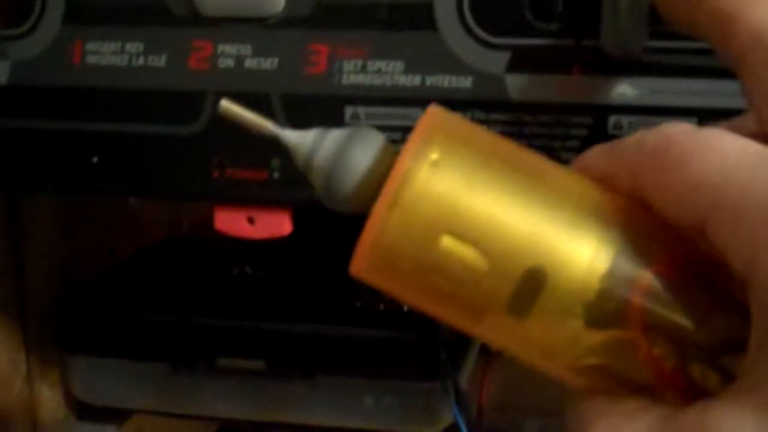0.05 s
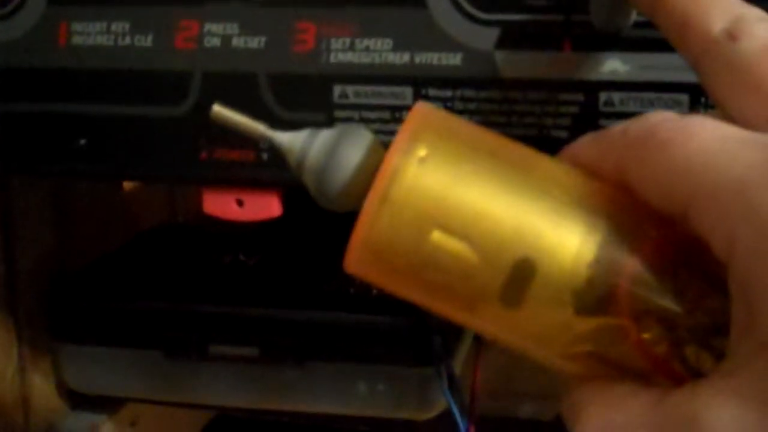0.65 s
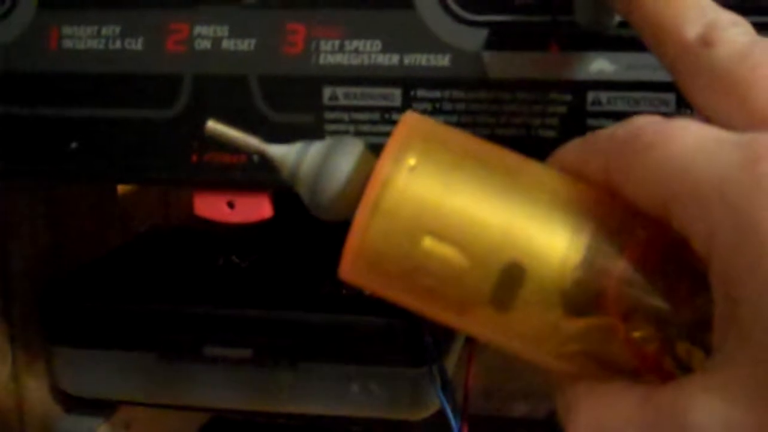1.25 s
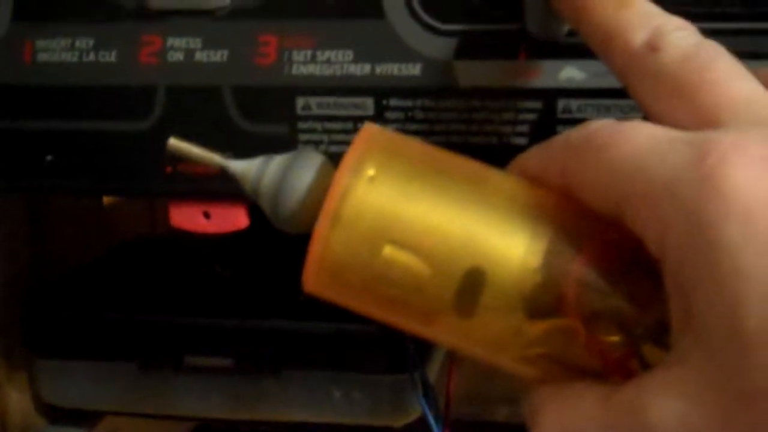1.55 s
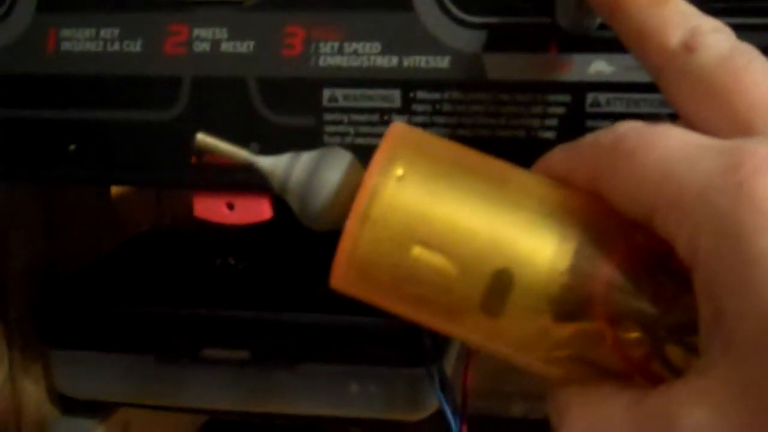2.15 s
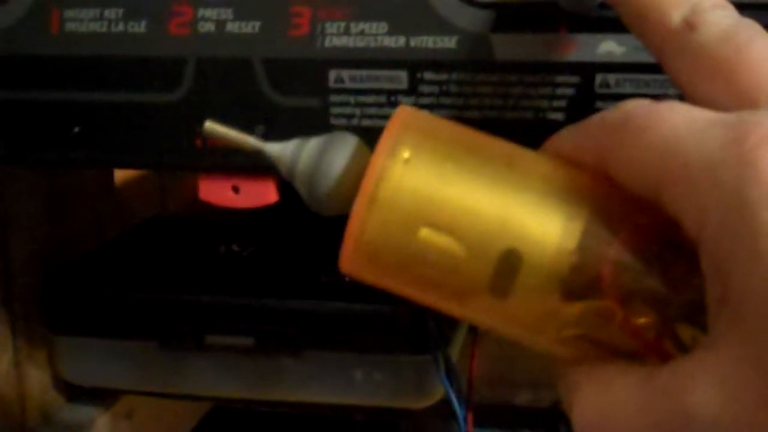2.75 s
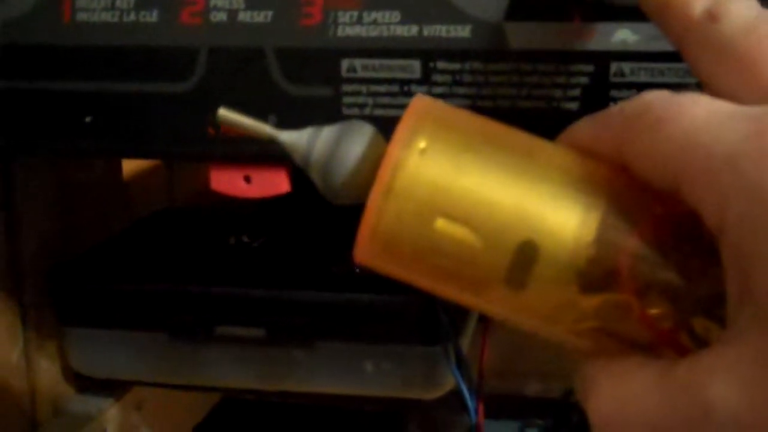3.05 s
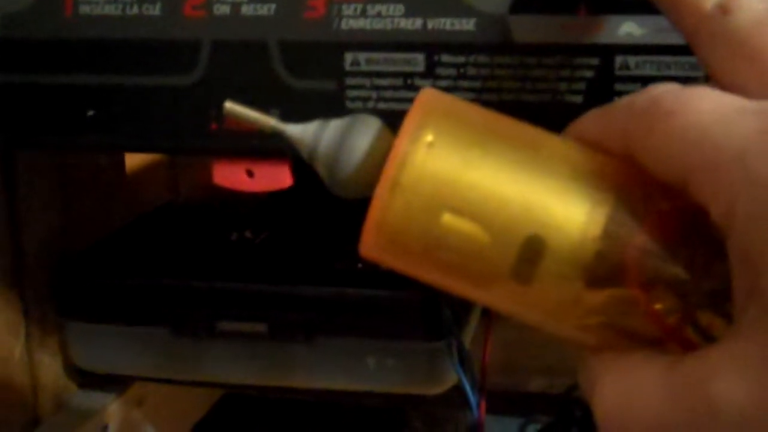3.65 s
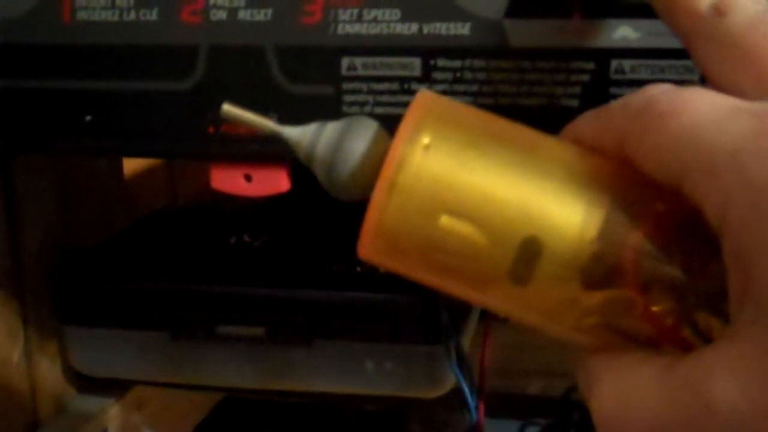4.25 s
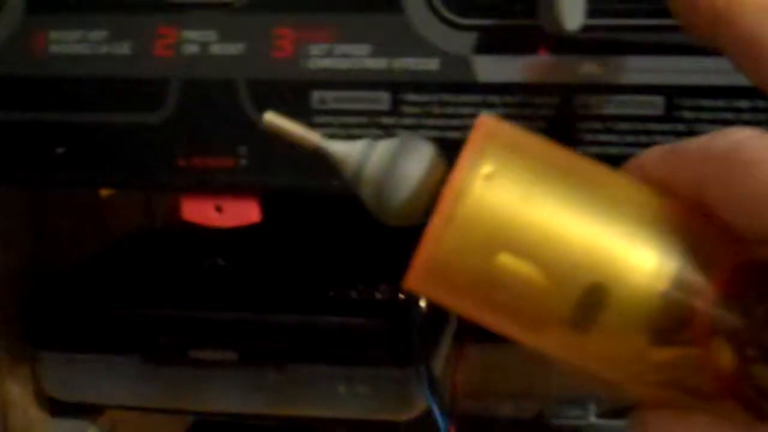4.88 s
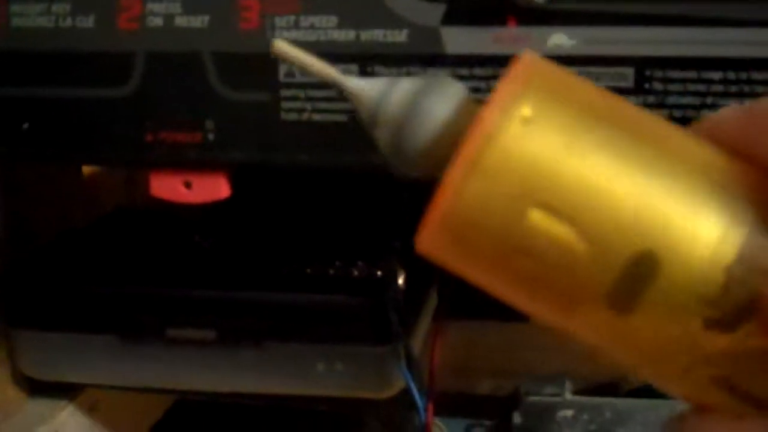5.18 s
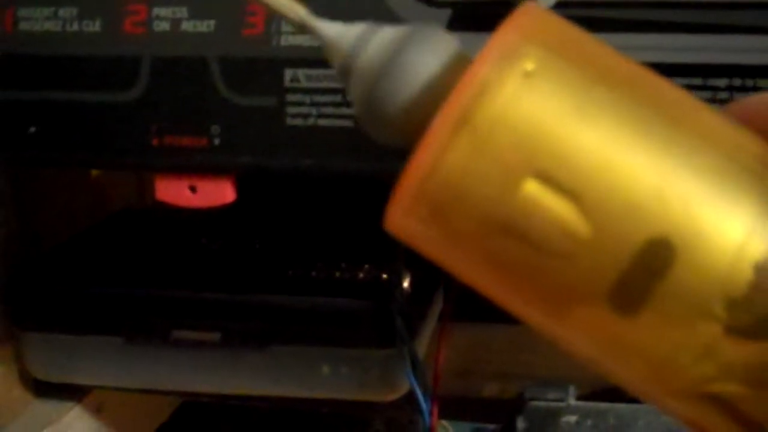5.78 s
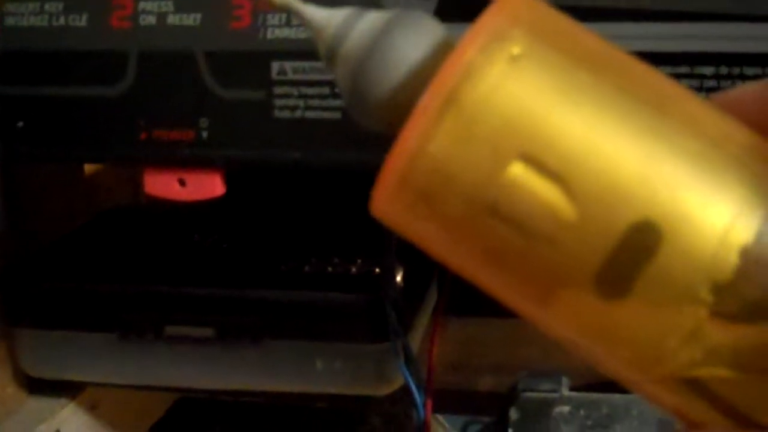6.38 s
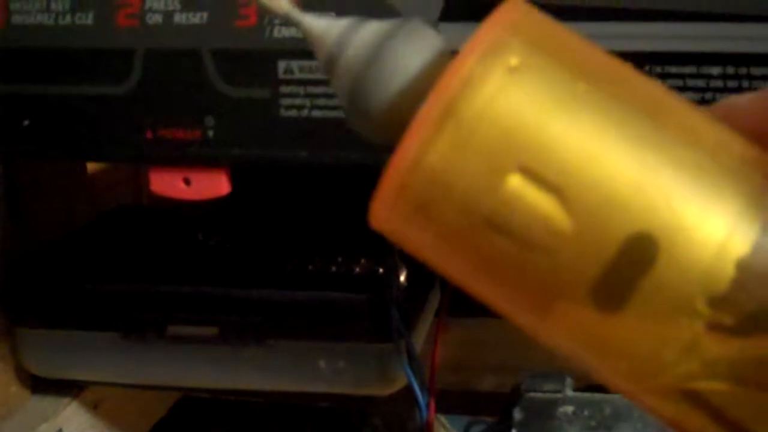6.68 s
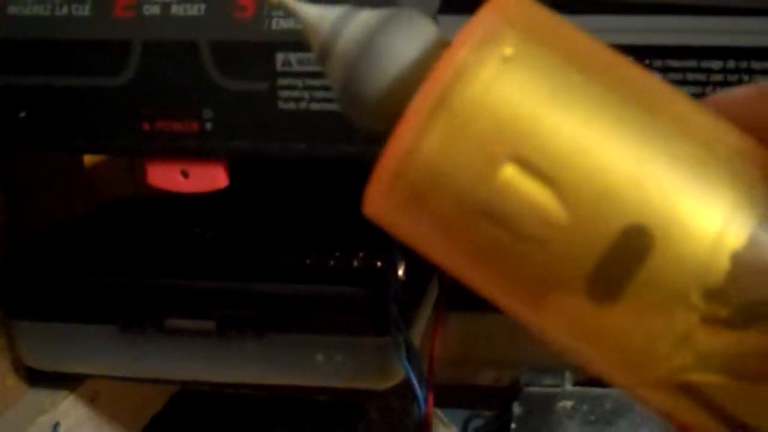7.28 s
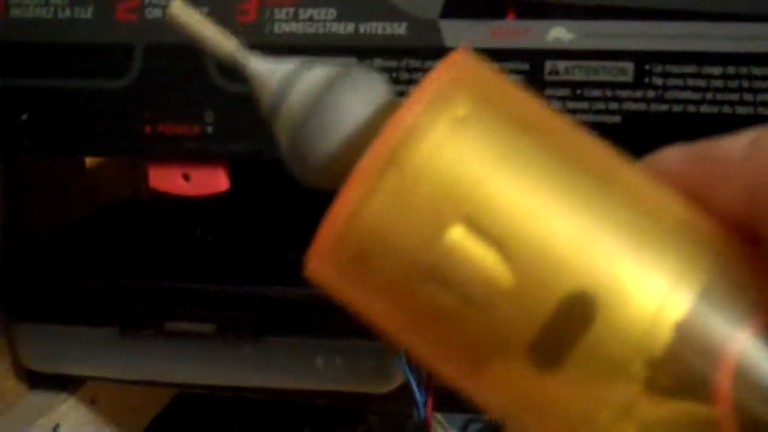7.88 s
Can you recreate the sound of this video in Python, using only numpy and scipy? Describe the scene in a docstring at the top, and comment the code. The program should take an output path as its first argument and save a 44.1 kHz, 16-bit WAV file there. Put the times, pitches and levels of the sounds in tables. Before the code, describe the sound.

A small hand-held electric motor is already running at full speed, close to the microphone in a quiet room. Its high, buzzy whine holds steady, mixed with hissing brushes, a rubbing bearing and a few light ticks. A soft handling bump comes at about 0.4 seconds. From about 1.6 seconds the whine glides down in pitch, falling further from 2.7 seconds and gradually weakening, with brief scuffs from the rotor early on. As the motor slows, its loose shaft knocks more distinctly, making a fast rattle that rings the metal can and plastic shell, with harder knocks around 4 seconds. At about 5 seconds the motor comes closer and the rattle grows brighter. From 5.6 seconds to the end at about 8 seconds it settles toward an idle with dense, uneven metallic knocks. A faint mains hum lies underneath throughout.

```python
"""A small motor whines at full speed, then slows to an idle, knocking more and more as it slows.
It is a hand-held three-pole DC motor, turned down by a speed controller that feeds it rectified mains.
The whine is harmonics of the turning rate. The brushes hiss, the rotor scuffs, and the shaft knocks
in its loose bearing, ringing the shell, can and end cap. The hand brings the motor closer at about 5 s.
Mains hum lies underneath."""
import sys
import numpy as np
from scipy import signal
from scipy.fft import rfft, irfft, next_fast_len
from scipy.io import wavfile
from scipy.ndimage import uniform_filter1d

SR = 44100
rng = np.random.default_rng(int(sys.argv[2]) if len(sys.argv) > 2 else 0)


def master_out(mix):
    """Clip the mix to full scale and print it as 16-bit PCM to the path in sys.argv[1]."""
    frames = np.transpose(np.atleast_2d(mix))
    ceiling = np.clip(frames, -1, 1)
    pcm = np.round(ceiling * 32767).astype(np.int16)
    wavfile.write(sys.argv[1], SR, pcm)


N = 358533
TIME = np.arange(N) / SR
FFT_SIZE = 2 * next_fast_len(N // 2 + 4096)
FREQS = np.maximum(np.arange(FFT_SIZE // 2 + 1) * SR / FFT_SIZE, 1)
POLES, RIPPLE_HZ = 3, 120  # rectified mains pushes twice a cycle


def rotor_speed(start_rps=183.6, inertia_s=1.32):
    """Turns per second (rps): inertia makes the rotor approach each setting exponentially."""
    # Controller settings. Each row: start in seconds, target in rps.
    settings = [(0.03, 188.1), (0.9, 185.6), (1.63, 86.8), (2.71, 42.2)]
    rps, previous_rps = np.full(N, start_rps), start_rps
    for start_s, target_rps in settings:
        rps += (target_rps - previous_rps) * (1 - np.exp(-np.maximum(TIME - start_s, 0) / inertia_s))
        previous_rps = target_rps
    return rps


def whine(rps, turns, gain_db, jitter_turns=.0013, flare_hz=6150, flare_width_hz=760, flare_db=7.5):
    """Rotor harmonics glide through the housing's resonances; supply ripple adds sidebands."""
    # Rotor tones. Each row: multiple of the turning rate, source dB at full speed, medium speed, idle.
    harmonics = [(1, -45, -55, -60), (2, -56, -60, -62), (3, -39, -42, -40), (4, -53, -49, -62),
                 (5, -47, -48.5, -57), (6, -40, -50, -59), (7, -41, -48, -59), (8, -41.5, -46, -58),
                 (9, -35, -47, -47.5), (10, -43, -46, -58), (11, -39, -48, -57), (12, -58, -46, -45.5),
                 (13, -46, -43, -59), (14, -38.5, -46.5, -57), (15, -52, -45, -48), (16, -47, -46, -51),
                 (17, -49, -51, -52), (18, -45, -48, -49), (19, -50, -47, -53), (20, -49, -51, -48),
                 (21, -52, -47, -47), (22, -53, -47, -47), (23, -53, -54, -48), (24, -38, -50, -50),
                 (25, -43, -56, -54), (27, -38.5, -49, -48), (28, -46, -58, -59), (30, -38.5, -44, -51),
                 (31, -46, -54, -56), (32, -49, -53, -57), (33, -45, -49, -53), (34, -53, -48, -60),
                 (35, -49, -47, -60), (37, -51, -48, -56), (38, -52, -47, -60), (40, -46, -42.5, -61),
                 (41, -48, -45, -61), (43, -48, -41.5, -60), (47, -54, -49, -60), (49, -56, -50, -60),
                 (51, -56, -48, -58), (60, -58, -49, -52)]
    # Radiation of the small housing. Each row: frequency in Hz, gain in dB.
    radiation = [(100, -43), (200, -32), (265, -17.5), (335, -18.5), (430, -6), (560, 0), (700, 0),
                 (850, -5.5), (1100, 0), (2000, 0.8), (4500, 0.8), (6350, 0), (6700, -8), (10000, -15)]
    # Flicker of gliding tones. Each row: frequency in Hz, depth in dB at medium speed.
    flicker = [(420, 1.3), (600, 2.8), (1500, 2), (5000, 1)]
    angle = 2 * np.pi * (turns + jitter_turns * drift(25))
    coarse_rps, coarse_s = rps[::64], TIME[::64]
    fast = np.clip((coarse_rps - 160) / 23, 0, 1)
    slow = np.clip((95 - coarse_rps) / 22, 0, 1)
    crawl_db = 7 * np.clip((68 - coarse_rps) / 24, 0, 1)
    gliding = (1 - fast) * (1 - slow / 2)
    octaves = np.log2(np.outer([row[0] for row in harmonics], coarse_rps))
    peaks_db = 1.8 * gliding * drift(16, octaves)  # narrow peaks and dips of housing and room
    tones = np.zeros(N)
    for (multiple, full_db, medium_db, idle_db), peak_db in zip(harmonics, peaks_db):
        hz = multiple * coarse_rps
        db = medium_db + fast * (full_db - medium_db) + slow * (idle_db - medium_db)
        db += peak_db + at_hz(radiation, hz)
        db += flare_db * bell(hz, flare_hz, flare_width_hz)
        db += .37 * np.clip(hz / 1200, 0, 1) ** 2 * drift(15, coarse_s)  # slight waver
        db += gliding * at_hz(flicker, hz) * drift(28, coarse_s)
        db -= crawl_db * np.clip((530 - hz) / 120, 0, 1)  # deep tones fade at a crawl
        gain = np.interp(TIME, coarse_s, from_db(db))
        tones += gain * np.sin(multiple * angle + rng.uniform(0, 2 * np.pi))
    # Ripple shakes both force and speed, so the upper sideband is the stronger.
    ripple = np.exp(2j * np.pi * RIPPLE_HZ * TIME)
    sidebands = 1 + .36 * ripple + .024 * ripple.conj()
    return np.sqrt(2) * from_db(gain_db) * (signal.hilbert(tones, FFT_SIZE)[:N] * sidebands).real


def motor_noise(rps, turns, scatter_db, swing_db):
    """Rub, hiss and rattle, all pulsing with the rotor. Rows: direct, scattered sound."""
    # Part levels. Each row: speed in rps, base dB of rub, brushes, shell, can, end cap.
    levels = [(41.8, -32.5, -37.5, -42.5, -43, -47.5), (59, -31.5, -30.5, -37.5, -36.5, -37.5),
              (72, -31, -28, -34, -35.5, -35), (89, -27.5, -23.5, -32, -38, -26.5),
              (118, -29, -24, -30, -38, -28.5), (124, -31, -24.5, -31.5, -34, -26.5),
              (137, -31.5, -22, -30, -41, -24), (142, -33, -24, -35, -35.5, -25.5),
              (147, -32, -26, -34, -35, -24), (158, -29.5, -27, -35.5, -34.5, -24),
              (188, -32.5, -26.5, -34.5, -31.5, -22)]
    # Gain when held near, in dB: rub, brushes, shell, can, end cap.
    near_db = (2.32, 3.6, 0.5, 9.6, 14.9)
    parts_db = at_speed(levels, rps) + np.outer(near_db, nearness())
    rub_db, brush_db, shell_db, can_db, cap_db = parts_db
    scuff_rub_db, scuff_hiss_db, scuff_can_db = scuffing()
    surge = from_db(scuff_hiss_db + .87 * drift(40))
    knock = shaft_knocks(turns, scatter_db, swing_db)
    hard_cap, hard_can = hard_knocks(rps)
    # Only a share of each part's power follows the knocks.
    rubbing, brushing, ringing = [np.sqrt(1 - share + share * knock ** 2) for share in (.31, .43, .64)]
    rub = bearing_rub(from_db(rub_db + scuff_rub_db) * rubbing, rps, turns)
    hiss = brush_hiss(from_db(brush_db) * brushing * surge, hard_cap)
    shell = shell_ring(from_db(shell_db) * ringing)
    can = can_ring(from_db(can_db + scuff_can_db) * ringing * surge, hard_can)
    cap = end_cap_rattle(from_db(cap_db) * knock * surge, hard_cap)
    return echoes(hiss_dip(rub + hiss) + shell + can + cap + sizzle(knock * surge))


def shaft_knocks(turns, scatter_db, swing_db, jitter_s=.0005, play_limit=.6, floor=.07):
    """Envelope, rms near 1: the loose shaft knocks as each pole passes; the play caps the force."""
    passes = np.flatnonzero(np.diff(np.floor(POLES * (turns - .15))))
    strength, timing = rng.standard_normal((len(passes), 2)).T
    hits = np.clip(passes + (timing * jitter_s * SR).astype(int), 0, N - 1)
    strength = np.clip(strength, -2.5, play_limit)
    unbalance_db = swing_db * np.cos(2 * np.pi * (turns - .17))  # presses harder on one side
    energy = np.zeros(N)
    energy[hits] = from_db(scatter_db[passes] * strength + unbalance_db[passes]) ** 2
    power = contact(energy, rise_s=.00125)
    power /= uniform_filter1d(power, SR // 4) + 1e-9
    return np.sqrt((power + floor) / (1 + floor))


def hard_knocks(rps, rebounds=2, loss_db=7.5):
    """End cap and can envelopes of knocks that use up all the play and rebound as the next poles pass."""
    # Each row: start in seconds, relative peak dB in the end cap, in the can.
    knocks = [(0.629, -11, -29), (0.645, -12, -31), (0.7797, -12, -32), (0.8553, -11, -23),
              (1.0543, -11, -33), (1.2052, -12, -29), (1.2804, -12, -31), (3.7534, -15, -31),
              (3.7639, -18, -31), (3.7763, -17, -24), (3.7885, -17, -32), (3.8259, -15, -23),
              (3.8889, -17, -29), (3.9014, -18, -28), (3.9275, -15, -34), (4.0189, -18, -25),
              (4.18, -19, -29), (4.2939, -19, -33), (4.4293, -17, -28), (4.9401, -17, -26),
              (4.9574, -19, -24), (5.1502, -21, -32), (5.6491, -16, -18), (5.7012, -14, -20),
              (5.7606, -14, -28), (5.8051, -15, -24), (5.8578, -16, -17), (5.9173, -16, -20),
              (5.9242, -15, -23), (5.9577, -14, -21), (5.9984, -13, -21), (6.0046, -15, -20),
              (6.0192, -14, -22), (6.0594, -12, -19), (6.0999, -15, -29), (6.1413, -13, -23),
              (6.2439, -14, -18), (6.2508, -14, -23), (6.2714, -15, -21), (6.2852, -15, -18),
              (6.2989, -14, -18), (6.326, -14, -16), (6.368, -13, -15), (6.4098, -15, -19),
              (6.4523, -17, -19), (6.5159, -13, -17), (6.5228, -18, -18), (6.601, -14, -21),
              (6.6291, -17, -23), (6.6438, -16, -22), (6.7297, -18, -20), (6.7513, -17, -26),
              (6.7729, -18, -21), (6.8168, -11, -20), (6.9838, -19, -31), (6.991, -17, -22),
              (7.0491, -18, -17), (7.057, -20, -18), (7.1154, -16, -19), (7.1663, -17, -21),
              (7.1887, -18, -16), (7.2255, -18, -24), (7.2326, -17, -19), (7.256, -18, -25),
              (7.2994, -15, -20), (7.366, -16, -17), (7.4328, -19, -20), (7.4553, -17, -20),
              (7.4997, -17, -19), (7.5149, -18, -24), (7.5225, -17, -23), (7.5894, -19, -21),
              (7.6563, -18, -18), (7.6726, -19, -25), (7.8072, -20, -20), (7.8155, -17, -17),
              (7.9537, -17, -26), (7.9761, -15, -23), (7.9901, -20, -18), (7.997, -19, -19),
              (8.0672, -19, -22), (8.088, -20, -19)]
    energy = np.zeros((2, N + SR))
    next_starts_s = [row[0] for row in knocks[1:]] + [np.inf]
    for (start_s, *peaks_db), next_s in zip(knocks, next_starts_s):
        pole_s = 1 / (POLES * np.interp(start_s, TIME, rps))
        for k in range(rebounds + 1):
            if k == 0 or start_s + (k + .5) * pole_s < next_s:
                hit = int((start_s + k * pole_s) * SR)
                energy[:, hit] += from_db(np.array(peaks_db) - k * loss_db) ** 2
    return [np.sqrt(contact(part[:N], rise_s=.0012)) for part in energy]


def scuffing():
    """Level changes in dB as the rotor briefly scuffs or runs free, with abrupt edges."""
    # Each row: centre in seconds, length in seconds, dB on rub, dB on hiss and rattle, more dB on can.
    scuffs = [(0.134, 0.025, 3, 3.5, 0), (0.885, 0.025, 0, -3, 0), (0.918, 0.018, 3, 2.5, 1),
              (1.254, 0.028, 6.5, 3.2, 0), (1.445, 0.034, 3, 4.2, 1.5), (1.823, 0.04, 5.5, 5, 0),
              (2.1, 0.03, -1, -1, -3.5), (2.143, 0.014, 4, 2.5, 5), (2.345, 0.035, -5, -1.2, -2.5)]
    extra_db = np.zeros((3, N))
    for centre_s, length_s, *parts_db in scuffs:
        extra_db += np.outer(parts_db, bell(TIME, centre_s, length_s, order=4))
    return extra_db


def end_cap_rattle(envelope, hard, clump_db=1.3, clumps_per_s=70):
    """The shaft rattles the end cap in short clumps; hard knocks override the ordinary ones."""
    # Each row: frequency in Hz, relative dB.
    spectrum = [(2000, -46), (5000, -25), (6800, -30), (7700, -1), (9400, -10.5), (10500, -17.5),
                (14500, -38.5)]
    # Each row: resonance in Hz, width in Hz, dB held away, dB held near.
    modes = [(7370, 510, 1, 4.5), (7773, 440, 10.5, 8.5), (7540, 220, 10, 6), (8064, 87, 8.5, 13.5),
             (8600, 340, -1.5, 1.5)]
    clumps = from_db(clump_db * drift(clumps_per_s))
    return struck(np.maximum(envelope * clumps, from_db(-.8) * hard), spectrum, modes)


def can_ring(envelope, hard):
    """The knocked can rings, louder at first, then louder or softer as the hand turns it."""
    # Each row: frequency in Hz, relative dB.
    spectrum = [(500, -38), (1500, -17.5), (2600, -17), (3800, -7), (4500, -18), (9000, -55)]
    # Each row: resonance in Hz, width in Hz, dB held away, dB held near.
    modes = [(2257, 300, -38, -6), (3143, 220, -7, -4), (3562, 140, 2.5, -3.5), (3818, 133, 1.5, -2),
             (4290, 790, -7, -33)]
    # Each row: centre in seconds, length in seconds, gain in dB.
    swells = [(0.3, 1.56, 6), (5.262, 0.17, -6), (5.74, 0.4, 2.5)]
    return struck(np.maximum(envelope * swell_gain(swells), from_db(-.3) * hard), spectrum, modes)


def shell_ring(envelope):
    """The rattle rings the plastic shell, swelling as the hand turns it."""
    # Each row: frequency in Hz, relative dB.
    spectrum = [(1500, -53), (2300, -8.5), (2900, -11.5), (3500, -25), (7000, -55)]
    # Each row: resonance in Hz, width in Hz, dB held away, dB held near.
    modes = [(2523, 360, -2, -5.5), (2615, 77, 0.5, -1), (2720, 260, -9.5, -3), (2980, 420, -35, -3.5)]
    # Each row: centre in seconds, length in seconds, gain in dB.
    swells = [(2.53, 0.09, 3.4), (5.39, 0.59, 8.8)]
    return resonant_noise(envelope * swell_gain(swells), spectrum, modes)


def brush_hiss(envelope, hard):
    """The sliding brushes hiss; hard knocks excite them too."""
    # Each row: frequency in Hz, relative dB.
    spectrum = [(900, -42), (2000, 1), (3000, -4.5), (3600, 4), (4400, -2.5), (4900, 2.5), (5600, 2.5),
                (6900, 1), (7600, 10), (8250, -18), (9300, -34), (10000, -13), (10700, -28), (11600, -16),
                (14500, -33.5)]
    # Each row: resonance in Hz, width in Hz, dB held away, dB held near.
    modes = [(6040, 570, 0.5, -3), (8540, 460, 9.2, -20)]
    return resonant_noise(np.maximum(envelope, from_db(-13) * hard), spectrum, modes)


def bearing_rub(envelope, rps, turns, beat_db=2, beat_above_rps=135):
    """The bearing rubs, throbbing at high speed as rotor and supply ripple beat."""
    # Each row: frequency in Hz, relative dB.
    spectrum = [(150, -51), (300, -32), (420, -18), (560, -8.5), (690, -6), (850, -9), (1100, 2), (1500, 5),
                (2000, 4), (2350, -16.5), (3500, -2), (7000, -56)]
    # Each row: resonance in Hz, width in Hz, dB held away, dB held near.
    modes = [(263, 35, -20.5, -15.5), (391, 90, -40, -13.5), (643, 105, -3.5, -31), (996, 260, -40, -1),
             (1680, 590, -1, -16)]
    beat = (rps > beat_above_rps) * np.cos(2 * np.pi * (turns - RIPPLE_HZ * TIME))
    return resonant_noise(envelope * from_db(beat_db * beat), spectrum, modes)


def sizzle(envelope, trim_db=1.5):
    """A fine sizzle above the end cap's ring."""
    # Each row: frequency in Hz, relative dB.
    spectrum = [(7000, -45), (8800, -0.5), (9300, 3), (9700, -5.5), (10300, -18.5), (11500, -21),
                (14500, -49)]
    # Each row: time in seconds, base level in dB.
    level = [(0.0, -46), (0.09, -39), (0.38, -46), (1.98, -37.5), (2.3, -38), (2.5, -34), (3.85, -33.5),
             (4.94, -47), (5.81, -44.5), (7.91, -54), (8.0, -55)]
    return body(from_db(in_time(level) + trim_db) * envelope * rng.standard_normal((2, N)), spectrum)


def nearness():
    """How near the hand holds the motor."""
    # Each row: time in seconds, nearness from 0 to 1.
    pose = [(0, 0.02), (4.9, 0), (5.4, 0.65), (5.7, 1), (8.13, 1)]
    return in_time(pose)


def hiss_dip(hiss, centre_s=5.5, length_s=.1, hz=3750, width_hz=1000, gain_db=-5):
    """One band of the hiss sinks briefly as the hand turns the motor."""
    band = irfft(rfft(hiss, FFT_SIZE) * bell(FREQS, hz, width_hz))[:, :N]
    return hiss + (swell_gain([(centre_s, length_s, gain_db)]) - 1) * band


def echoes(sound):
    """First reflections off the machine and bench nearby."""
    # Each row: delay in seconds, gain.
    reflections = [(.0043, 0.078), (.0079, -0.16), (0.012, 0.074), (0.0183, -0.036), (.027, 0.036)]
    out = sound.copy()
    for delay_s, gain in reflections:
        lag = int(delay_s * SR)
        out[:, lag:] += gain * sound[:, :-lag]
    return out


def hand_bump(start_s=.388, hz=255, level_db=-44, t60_s=.12):
    """One soft bump of the hand: a damped low tone."""
    age_s = np.maximum(TIME - start_s, 0)
    return from_db(level_db - 60 * age_s / t60_s) * np.sin(2 * np.pi * hz * age_s)


def background():
    """Mains hum and the faint rumble of a still room."""
    # Each row: frequency in Hz, rms level in dB.
    hum_tones = [(60, -48.5), (120, -67.5)]
    # Each row: frequency in Hz, relative dB.
    room = [(20, -6), (45, 2), (100, 0), (200, -24), (500, -17), (4000, -25), (15000, -35)]
    hum = sum(np.sqrt(2) * from_db(db) * np.sin(2 * np.pi * hz * TIME) for hz, db in hum_tones)
    return hum + from_db(-70) * body(rng.standard_normal(N), room)


def stereo_ports(tones, noise):
    """Two microphone ports: alike in the bass, shaded and shifted differently in the treble."""
    # Each row: frequency in Hz, left minus right in dB.
    balance = [(200, -4), (700, -1), (1500, -2), (2600, -2.5), (3500, 0), (4500, -1.5), (5500, -7.5),
               (6300, -7), (7000, 8), (7700, 12.5), (8600, 13.5), (9500, 6.5), (11000, 16), (14000, 22)]
    # Each row: frequency in Hz, coherence from 0 to 1.
    coherence = [(100, 0.93), (700, 0.93), (1600, 1), (2500, 0.96), (3000, 1), (6000, 0.97), (7000, 0.84),
                 (9200, 1), (10300, .12)]
    # Each row: frequency in Hz, lead of the right port in radians.
    lead = [(300, -0.03), (2000, 0.41), (2800, 0.96), (4200, 0.7), (5100, 1.64), (6800, -1.8), (7600, 1.1),
            (8800, 1.6)]
    alike, lead_rad = at_hz(coherence, FREQS), at_hz(lead, FREQS)
    tilt = from_db(at_hz(balance, FREQS) / 2)
    direct, scattered = rfft(noise, FFT_SIZE)
    direct = direct * np.sqrt((1 + alike) / 2) + rfft(tones, FFT_SIZE)
    scattered *= np.sqrt((1 - alike) / 2)
    left = (direct + scattered) * tilt
    right = (direct - scattered) / tilt * np.exp(1j * lead_rad)
    mid_gain = np.sqrt(tilt ** 2 + tilt ** -2 + 2 * alike * np.cos(lead_rad)) / 2
    return irfft(np.array([left, right]) / mid_gain)[:, :N]


def contact(energy, rise_s):
    """Spread each impulse of energy into a short burst that peaks at its height."""
    age = np.arange(SR // 40) / SR / rise_s
    return np.maximum(signal.fftconvolve(energy, age ** 2 * np.exp(2 * (1 - age)))[:N], 0)


def struck(force, spectrum, modes, window_s=.008, follow=.6):
    """A knocked part rings with an energy that partly follows the force of each knock."""
    ring = resonant_noise(force, spectrum, modes)
    drive, energy = [uniform_filter1d(x ** 2, int(window_s * SR)) + 1e-12 for x in (force, ring)]
    return ring * (drive / energy) ** (follow / 2)


def resonant_noise(envelope, spectrum, modes):
    """Direct and scattered noise through resonances whose weights shift as the motor nears."""
    noise = envelope * rng.standard_normal((2, N))
    near, modes = nearness(), np.array(modes)
    held_away = body(noise * np.sqrt(1 - near), spectrum, modes[:, [0, 1, 2]])
    held_near = body(noise[::-1] * np.sqrt(near), spectrum, modes[:, [0, 1, 3]])
    return held_away + held_near


def body(x, spectrum, modes=(), size=8192):
    """Minimum-phase filter of unit power gain: a broad colour with resonances on top."""
    freqs = np.maximum(np.arange(size // 2 + 1) * SR / size, 1)
    power = from_db(at_hz(spectrum, freqs)) ** 2
    for hz, width_hz, db in modes:
        power += (from_db(db) / (1 + (2 * (freqs - hz) / width_hz) ** 2)) ** 2
    cepstrum = irfft(np.log(power / power.mean()) / 2)
    cepstrum[1:size // 2] *= 2
    cepstrum[size // 2 + 1:] = 0
    response = irfft(np.exp(rfft(cepstrum)))
    return signal.oaconvolve(np.atleast_2d(x), response[None], axes=1)[:, :N].reshape(x.shape)


def drift(rate, axis=TIME):
    """Random wander of rms 1, with `rate` knots per unit of the axis."""
    knots = rng.standard_normal(400)
    wander = np.interp(axis * rate % len(knots), np.arange(len(knots)), knots)
    return wander / np.sqrt(np.mean(wander ** 2) + 1e-20)


def bell(x, centre, width, order=2):
    """Bell of height 1; width is taken at 1/e."""
    return np.exp(-(2 * (x - centre) / width) ** order)


def swell_gain(rows):
    """Gain of smooth swells and dips."""
    return from_db(sum(db * bell(TIME, centre_s, length_s) for centre_s, length_s, db in rows))


def from_db(db):
    """Decibels to gain."""
    return 10 ** (np.asarray(db) / 20)


def in_time(rows):
    """A curve at every sample."""
    return np.interp(TIME, *np.transpose(rows))


def at_hz(rows, hz):
    """Read a curve on a log-frequency axis."""
    knots_hz, values = np.transpose(rows)
    return np.interp(np.log(hz), np.log(knots_hz), values)


def at_speed(rows, rps):
    """Each column of a table at the rotor's speed."""
    knots_rps, *columns = np.transpose(rows)
    return np.array([np.interp(rps, knots_rps, column) for column in columns])


def scene():
    """The rotor's speed and angle drive the whine and the rattle, over the hum."""
    # Shaft play. Each row: speed in rps, knock scatter in dB, once-a-turn swing in dB, whine gain in dB.
    play = [(44, 3.7, 3.4, -2), (52, 3.4, 2.2, -0.5), (61, 3.0, 3, 1), (84, 2.4, 8, -1.5),
            (110, 2.4, 4.5, -1), (160, 2.4, 3, 0), (186, 2.4, 2, 0)]
    rps = rotor_speed()
    turns = np.cumsum(rps) / SR
    scatter_db, swing_db, whine_db = at_speed(play, rps)
    tones = whine(rps, turns, whine_db) + hand_bump() + background()
    return stereo_ports(tones, motor_noise(rps, turns, scatter_db, swing_db))


def record(dry):
    """Round the highest peaks and cut the top."""
    ceiling, cutoff_hz = .95, 14600
    rounded = dry / (1 + (dry / ceiling) ** 6) ** (1 / 6)
    return signal.sosfilt(signal.ellip(10, .1, 100, cutoff_hz, fs=SR, output="sos"), rounded)


dry = scene()
out = record(dry)
master_out(out)
```